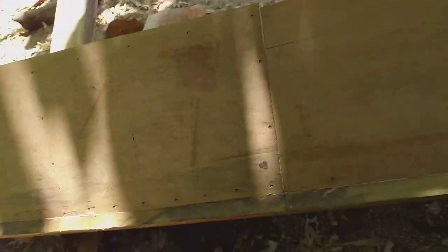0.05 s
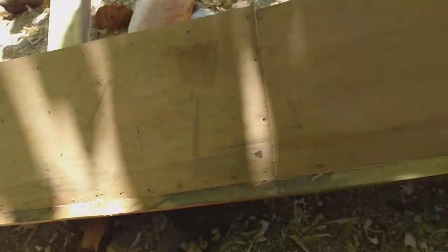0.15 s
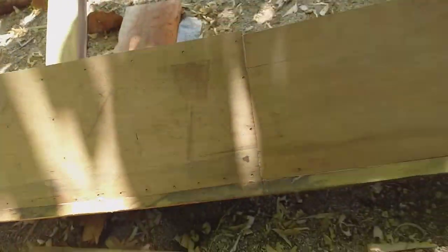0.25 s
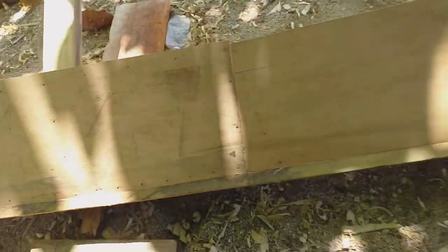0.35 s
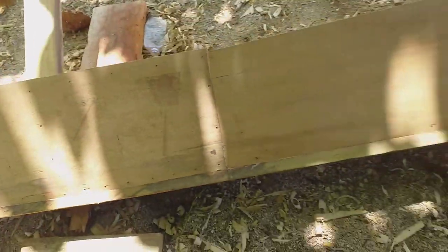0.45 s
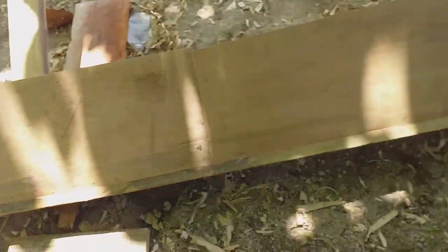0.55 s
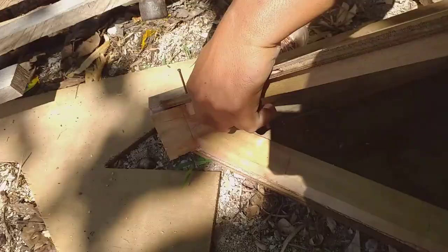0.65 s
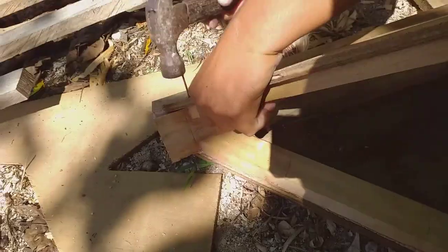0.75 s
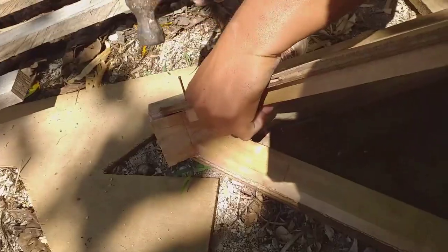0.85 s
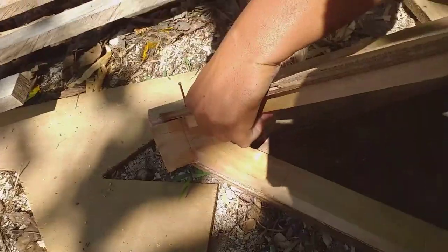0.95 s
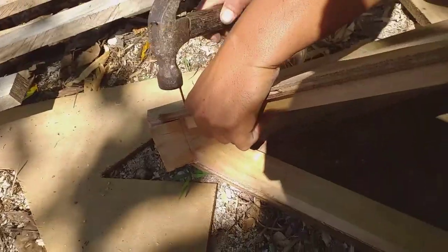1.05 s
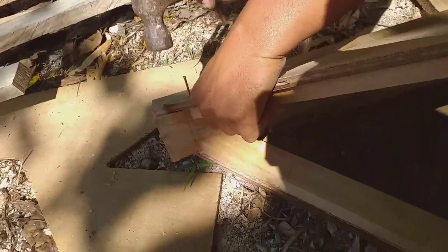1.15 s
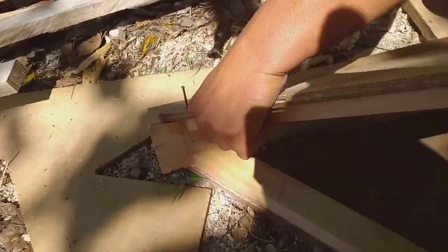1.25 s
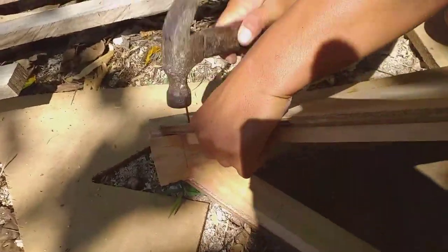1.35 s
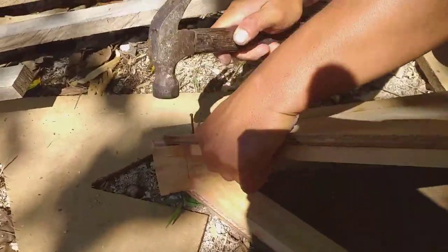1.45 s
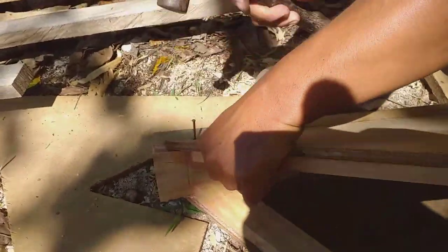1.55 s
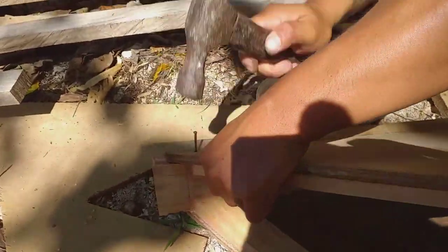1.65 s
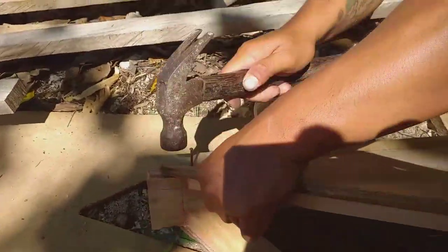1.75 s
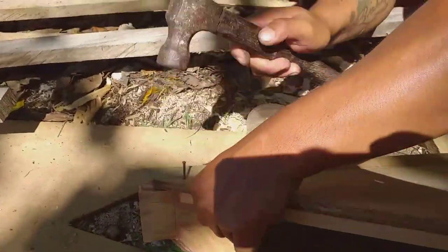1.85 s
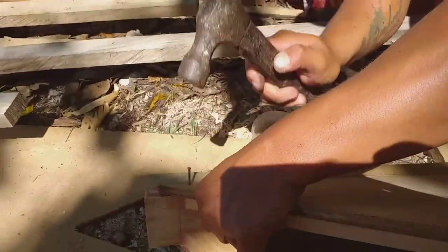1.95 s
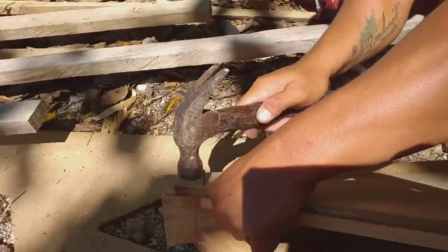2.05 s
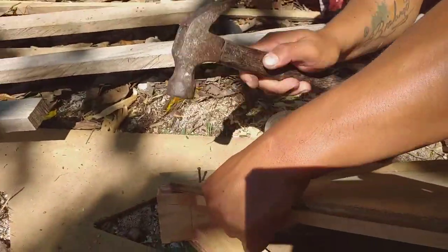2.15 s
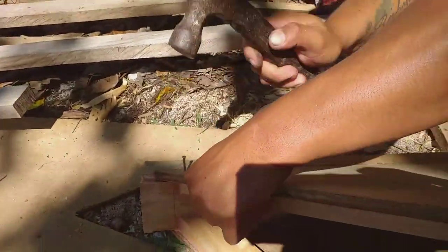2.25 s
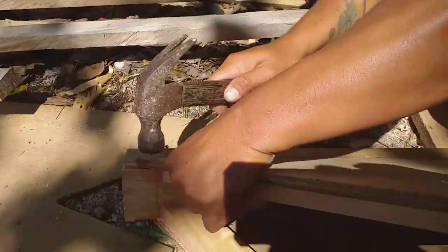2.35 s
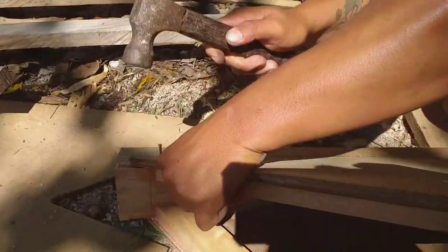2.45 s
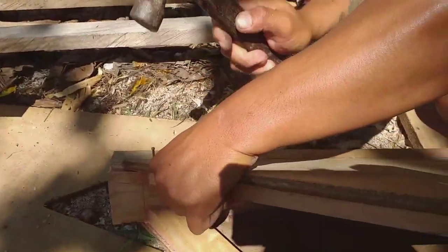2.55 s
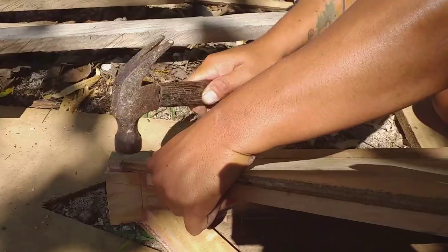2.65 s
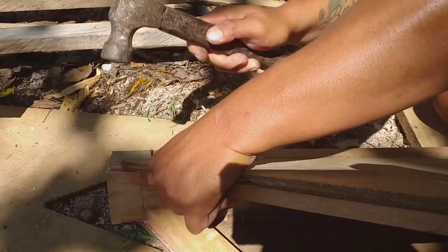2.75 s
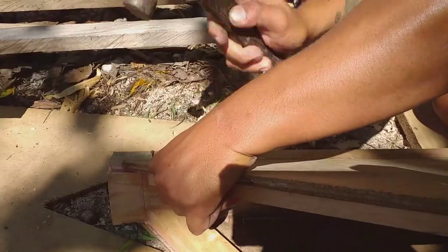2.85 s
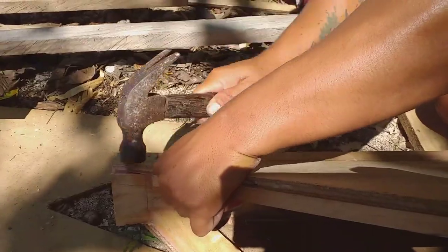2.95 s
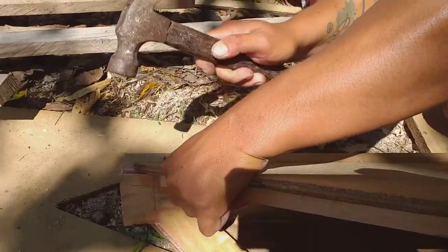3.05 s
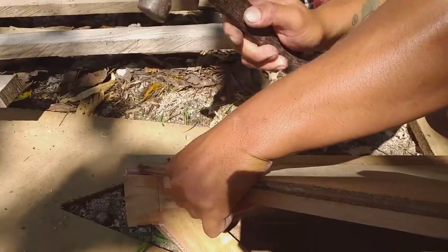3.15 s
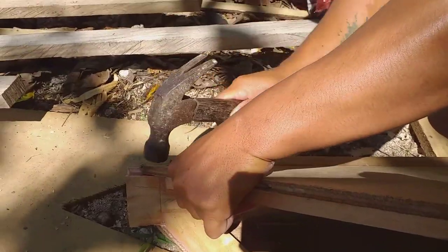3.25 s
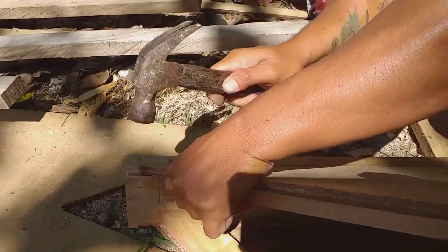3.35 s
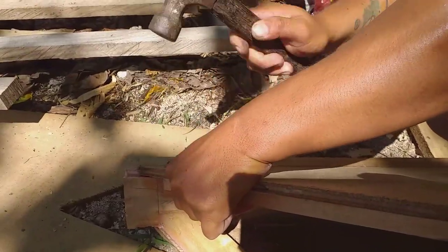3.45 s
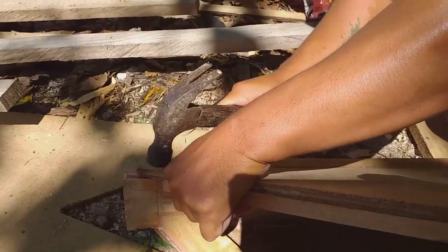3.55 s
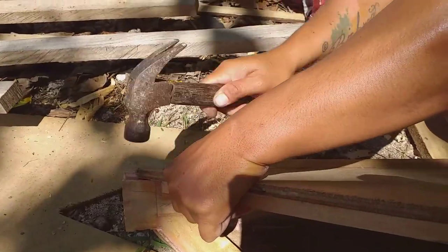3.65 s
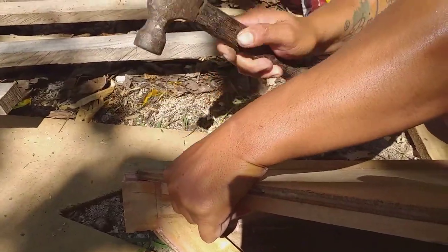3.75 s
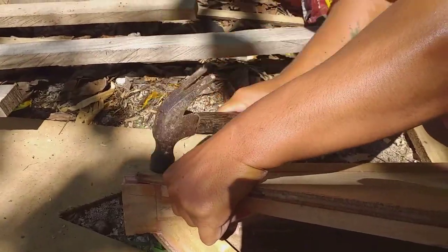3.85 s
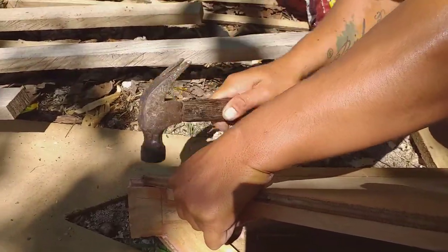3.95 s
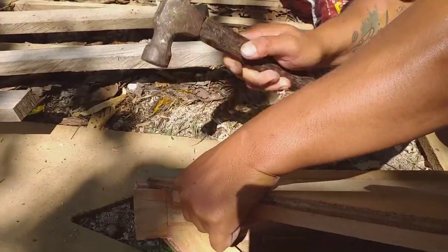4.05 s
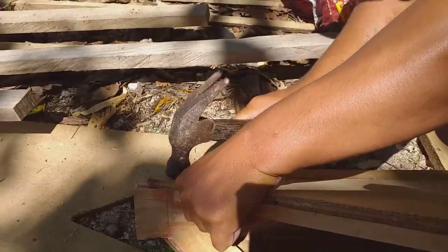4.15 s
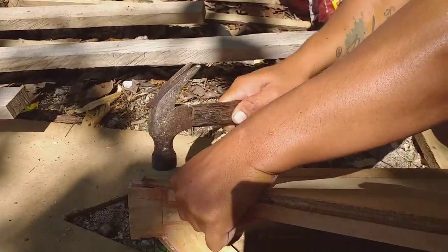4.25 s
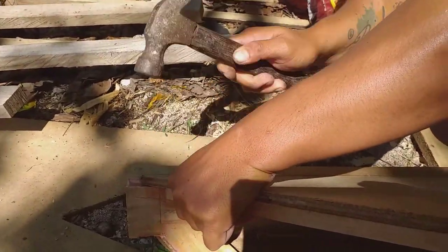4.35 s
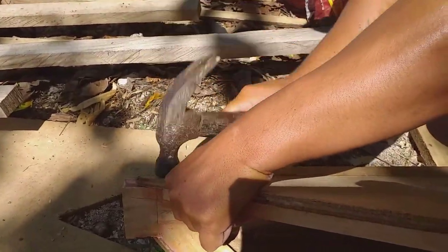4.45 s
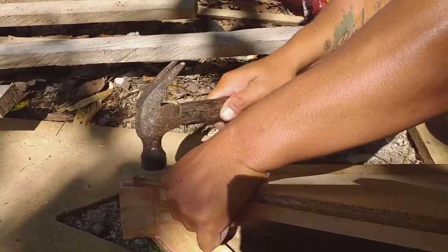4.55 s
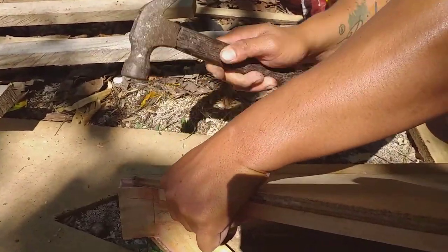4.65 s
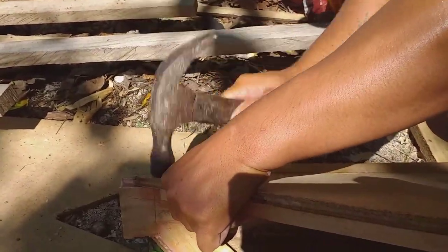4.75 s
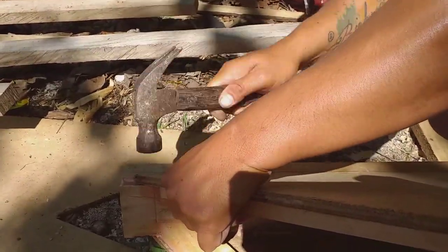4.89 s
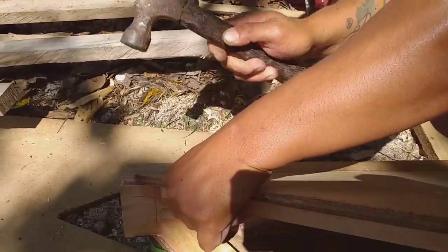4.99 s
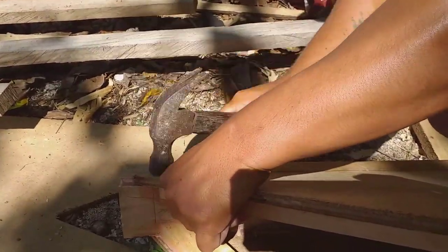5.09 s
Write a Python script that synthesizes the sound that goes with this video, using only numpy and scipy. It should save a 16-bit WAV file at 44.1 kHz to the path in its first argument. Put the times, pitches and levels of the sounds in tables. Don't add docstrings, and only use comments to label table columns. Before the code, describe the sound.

Handling bumps and dry rustle for under a second, then a claw hammer drives a nail into a wooden boat frame in steady, sharp blows.

```python
import sys
import numpy as np
from scipy import signal
from scipy.fft import rfft, irfft, next_fast_len
from scipy.io import wavfile
from scipy.ndimage import uniform_filter1d, map_coordinates

SR = 44100
rng = np.random.default_rng(int(sys.argv[2]) if len(sys.argv) > 2 else 0)


def gain_from_db(level_db):
    decades = np.asarray(level_db, float) / 20
    return 10 ** decades


def output_pcm(signal):
    pcm = np.clip(np.atleast_2d(signal).T, -1, 1) * 32767
    wavfile.write(sys.argv[1], SR, np.round(pcm).astype(np.int16))


N = 225770

# (time [s], crack [dB], push into wide panel [dB], narrow panel re wide [dB], rib re wide [dB])
BLOWS = [(0.7563, -2, -7.5, -7, -15), (1.068, 0, -17.5, 6.5, -3), (1.3868, 1.5, -15.5, 2, -3.5),
         (1.7087, 0, -15, -4.5, -6.5), (2.0298, .5, -13, -13, -1.5), (2.337, -1, -8, -7.5, -5),
         (2.6396, -1.5, -10, -11, -2), (2.9423, -1.5, -11.5, -7.5, 2.5), (3.268, -3, -10, 0, -4),
         (3.5837, 0, -8, -3, -4), (3.8901, -2, -7, -1, -4), (4.192, -1, -4, -1, -9),
         (4.4955, -0.5, -5.5, 0.4, -0.5), (4.8004, 0.5, -3, -1, -5), (5.1124, -3.5, -12.5, 5.5, 3.5)]
# (time [s], low parts [dB], high parts [dB])
SLAPS = [
    (1.098, -29, -47.5),
    (2.359, -30.5, -41.5),
    (2.961, -22.5, -34),
    (3.284, -24.5, -28.5),
    (3.624, -15, -26),
    (3.912, -11.5, -8),
    (4.21, -6, -12),
    (4.514, -6.5, -10),
    (4.819, -4.5, -9),
]
# (pitch [Hz], level [dB], time to fall 60 dB [s])
FRAME_TONES = [(62, 2.5, 0.071), (88.5, -15, 0.033), (117, -7, 0.12), (135, 11.5, 0.057)]
# (pitch [Hz], level [dB], time to fall 60 dB [s])
HEAD_TONES = [(4942, -3, .11), (5938, 0, .14)]
# (pitch [Hz], level [dB], time to fall 60 dB [s])
PLANK_TONES = [
    [(169.6, -19.5, .2), (207, -14, 0.1), (238.4, -1.5, 0.12), (272.9, -12, 0.19)],
    [(320, -6, .07), (355, 0, .09), (374, -10, .15), (392, -6, .175)],
    [(478, -6, 0.082), (531.6, 2.5, 0.065), (577.8, -4, 0.058), (678, -9.5, 0.052)],
    [(808.3, -2, 0.038), (846.3, -2, 0.062), (906, -4, 0.061)],
    [(1052.7, 5.5, 0.034), (1158, -9, .06), (1403, -8, 0.035), (1628, -6.5, .05), (1960, -14.5, 0.035)],
]
# (frequency [Hz], level per Hz [dB])
CRACK = [(530, -36.5), (900, -1), (1420, -3.5), (2060, -5), (2650, -9.5), (3670, -1.5), (5560, 0),
         (6810, -2), (7860, -3), (9000, -20.5), (11700, -46.5), (19800, -120)]
# (frequency [Hz], level per Hz [dB])
SCATTER = [(290, -32.5), (500, 1), (639, -14), (877, -4.5), (1510, -5.5), (2050, -7), (2400, -12.5),
           (3650, -8), (5300, -7.5), (6030, -5), (9160, -19), (13500, -19.5), (15600, -20)]
# (frequency [Hz], time to fall 60 dB [s])
YARD_DECAY = [(500, 0.1), (2000, 0.22), (5000, 0.25), (12000, 0.24)]
# (frequency [Hz], level per Hz [dB])
BOOM = [(30, -39), (60, -10.5), (90, 1), (170, 0), (270, 2), (450, -6.5), (700, -14), (1000, -27),
        (1500, -71)]
# (frequency [Hz], time to fall 60 dB [s])
BOOM_DECAY = [(80, .3), (200, .22), (500, .17), (1000, .14)]
# (frequency [Hz], level per Hz [dB])
SLAP_ECHO = [(250, -40.5), (450, 0.5), (700, -5), (1100, -7), (1700, -9.5), (3000, -22), (6000, -58)]
# (frequency [Hz], time to fall 60 dB [s])
SLAP_ECHO_DECAY = [(500, 0.28), (2000, 0.27)]
# (time [s], peak [dB], pitch [Hz], length [s])
BUMPS = [(0.104, -34, 100, 0.021), (0.177, -28, 79, 0.024), (0.278, -28.5, 121, 0.02),
         (0.292, -30.5, 140, 0.033), (0.382, -17, 175, 0.013), (0.422, -5.5, 171, 0.016),
         (0.443, -13.5, 108, 0.0088), (0.489, -17, 159.6, 0.023), (0.509, -16.5, 138, 0.023),
         (0.575, -4, 157, 0.013), (0.597, -18, 173, 0.011), (0.617, -25, 125, 0.026),
         (0.69, -18.5, 160, 0.014), (0.707, -37, 93, 0.028)]
# (time [s], peak [dB], treble re peak [dB], length [s])
TICKS = [
    (0.0004, -15, -9, 0.0037),
    (0.084, -39, -17, 0.0071),
    (0.235, -19, 5.5, 0.0067),
    (0.261, -27, 3.5, .013),
    (0.319, -21, 4.5, 0.038),
    (0.452, -34, -7, .02),
    (0.4654, 0.5, -19, 0.0046),
    (0.498, -28.5, 8, 0.0066),
    (0.557, -21.5, -7, 0.029),
    (0.637, -22.5, -9, 0.027),
]
# (frequency [Hz], level per Hz [dB])
DRY = [(530, -48), (900, -14.5), (3400, -7), (3670, -1.5), (4450, -7.5), (6490, -3), (9000, -16.5),
       (11700, -46.5), (19800, -120)]
# (start [s], length [s], pitch [Hz], level [dB])
COOS = [
    (0, .06, 430, -46),
    (.155, .14, 700, -41),
    (.243, .028, 14650, -37),
    (.27, .08, 1030, -52),
    (.26, .14, 1550, -50),
    (.29, .07, 2070, -51),
    (.4, .12, 1590, -51),
    (.42, .05, 660, -48),
]
# (start [s], length [s], pitch [Hz], level [dB], width [share of pitch])
SWISHES = [
    (0, .09, 1450, -41, .5),
    (.09, .13, 1600, -40, .45),
    (.12, .11, 12900, -36, .14),
    (2.49, .07, 6000, -57, .25),
    (2.52, .12, 6500, -65, .08),
    (.2, .2, 1570, -48, .12),
    (3.76, .13, 3900, -65, .08),
    (3.78, .1, 3050, -68, .07),
    (3.77, .13, 560, -67, .7),
    (4.38, .11, 7000, -63, .08),
]
# (frequency [Hz], level per Hz [dB])
RUMBLE = [(15, -29), (25, -11), (91, 3.5), (172, -8), (254, -13), (452, -22.5), (500, -22.5), (650, -53),
          (1100, -120)]
# (frequency [Hz], level per Hz [dB])
RUSTLE = [(150, -40.5), (250, -14), (615, -11), (703, -8.5), (855, -12.5), (1240, -11.5), (1580, -11),
          (1810, -13), (2300, -12.5), (8100, -11.5), (9000, -28.5), (11700, -46.5), (19800, -120)]
# (frequency [Hz], level per Hz [dB])
LEAVES = [(250, -45), (450, -13), (1000, -10), (2500, -7), (4000, -4), (6500, -3), (8000, -6), (9000, -20),
          (11000, -60)]
# (frequency [Hz], level per Hz [dB])
HISS = [(5000, -32.5), (8500, -10), (9240, -11), (10200, -7), (11300, -4.5), (13000, -4), (15100, -4.5),
        (15600, -21.5)]
# (time [s], effort [dB])
GRIP = [
    (0, -3.5),
    (.08, -11),
    (.17, 1),
    (.3, -3.5),
    (.4, -1),
    (.5, 2),
    (.64, 2.5),
    (.75, -1.5),
]
# (time [s], strength [dB])
BREEZE = [(.76, 4.5), (.86, 0.5), (1.3, -4.5), (1.7, -4), (1.9, 0.5), (2.3, -2), (2.5, -1), (3.22, -4.5),
          (3.5, -2), (3.8, -0.3), (4.2, 0.8), (4.7, 2.5), (5.12, 0.5)]

# (level with the nail proud [dB], gain once it is home [dB], gain by a full glance [dB])
TREBLE, THUD, YARD_ECHO = (-21.5, 2.4, 3.4), (-35, 1.5, 1.7), (-24.5, 1.8, -1.8)
HEAD_RING, BLOCK, UPPER_BLOCK = (-38, 5, 21), (-22, 8, -2.5), (-14, -4, 2.3)
GLANCE_DEPTH, GLANCE_SPREAD = .52, .18
BITE_DEPTH, BITE_DB = .25, 10
SLIDE_S = 0.0054
SETTING_TAP_DB = -3.5
SETTLED_DAMPING_DB_PER_S = 59.5
COO_RISE, COO_BLUR = .03, .015
INSECT_S, INSECT_RISE_S, INSECT_FADE_S, INSECT_HZ, INSECT_DB = 1.95, .13, .3, 12300, -60
SCENE_CHANGE_S = .752
CARRIED_DB, GRIP_SHARE = (-41.5, -40.5, -46), (2.1, .1, 0.45)
RESTING_DB, BREEZE_SHARE = (-65, -70, -78.5), (1.5, 1.1, .6)


def hammer():
    out, t = np.zeros(N), np.arange(SR // 2) / SR
    slide = (1 - np.exp(-(t / 0.00095) ** 2)) / (1 + (t / SLIDE_S) ** 4)
    depths = np.linspace(0, 1, len(BLOWS))
    for depth, (s, db, panel_db, narrow_db, rib_db) in zip(depths, BLOWS):
        glance = np.exp(-((depth - GLANCE_DEPTH) / GLANCE_SPREAD) ** 2)
        tap_db = SETTING_TAP_DB * (depth == 0)
        laws = BLOCK, UPPER_BLOCK, TREBLE, THUD, YARD_ECHO, HEAD_RING
        levels = [by_nail(law, depth, glance) + tap_db for law in laws]
        block_db, upper_db, treble_db, thud_db, echo_db, head_db = levels

        crack = gain_from_db(-6) * noise(CRACK, len(t)) + gain_from_db(treble_db + 2.0) * noise(HISS, len(t))
        bite_db = BITE_DB * (depth > BITE_DEPTH)
        thud = gain_from_db(thud_db + 8 + bite_db) * ring(FRAME_TONES, t, 0.01, spread_db=3, detune=0.051)
        blow = slide * crack + thud
        head = gain_from_db(head_db) * ring(HEAD_TONES, t, .002, spread_db=0, detune=0)
        push_db = [panel_db, panel_db + narrow_db, panel_db + rib_db, block_db, upper_db]
        wood = planks(t, push_db, attack=.0043) * gain_from_db(-SETTLED_DAMPING_DB_PER_S * depth * t)
        boom_swell = gain_from_db(-20.0 + 0.17 * panel_db) * (1 - np.exp(-t / 0.0028))
        boom = boom_swell * dying(BOOM, BOOM_DECAY, t, size=1024)
        echo = gain_from_db(echo_db) * yard_echo(t)
        add(out, s, gain_from_db(db) * blow + head + gain_from_db(5.5) * wood + boom + echo)
    return out + plank_slaps()


def plank_slaps():
    out, t = np.zeros(N), np.arange(SR // 2) / SR
    for s, low_db, high_db in SLAPS:
        slap = planks(t, [low_db, low_db, high_db, high_db - 3, high_db - 3], attack=.002)
        slap = slap * gain_from_db(-SETTLED_DAMPING_DB_PER_S * t)
        swell = gain_from_db(high_db - 23.5) * (1 - np.exp(-t / 0.0056))
        hollow = swell * dying(SLAP_ECHO, SLAP_ECHO_DECAY, t, size=512)
        clap = gain_from_db(high_db - 22 - 60 * t / .04) * noise(SCATTER, len(t))
        add(out, s, slap + hollow + clap)
    return out


def planks(t, levels_db, attack):
    return sum(gain_from_db(db) * ring(part, t, attack, spread_db=1.5, detune=.006)
               for db, part in zip(levels_db, PLANK_TONES))


def by_nail(law, depth, glance):
    return law[0] + law[1] * depth + law[2] * glance


def yard_echo(t):
    wall = 1 + .5 * np.exp(-((t - .024) / 0.0016) ** 2)
    near = dying(SCATTER, YARD_DECAY, t, size=256)
    far = gain_from_db(-19.5) * dying(LEAVES, [(500, 0.72), (6000, 0.57)], t, size=256)
    return patchy(near + far, depth_db=1) * wall * (1 - np.exp(-t / 0.0022))


def handling():
    out, t = np.zeros(N), np.arange(SR // 8) / SR
    for s, db, hz, length in BUMPS:
        u = t / length
        packet = (2.48 * u * np.exp(1 - 2.66 * u)) ** 2
        overtone = 0.58 * np.sin(4.1 * np.pi * hz * t) * np.exp(-3 * u)
        add(out, s, gain_from_db(db) * packet * (np.sin(2 * np.pi * hz * t) + overtone))
    for s, db, treble_db, length in TICKS:
        burst = noise(DRY, len(t)) + gain_from_db(treble_db) * noise(HISS, len(t))
        shape = (1 - np.exp(-t / 0.0018)) * np.exp(-(t / length) ** 2)
        add(out, s, gain_from_db(db - 16) * burst * shape)
    return out


def far_notes():
    out, t = np.zeros(N), np.arange(SR // 5) / SR
    coos = [coo + (COO_BLUR,) for coo in COOS]
    for s, length, hz, db, share in coos + SWISHES:
        u = np.clip(t / length, 0, 1)
        width_hz = share * hz
        blur = map_coordinates(rng.standard_normal(SR // 50), [t * width_hz + 2])
        steady = 30 / width_hz
        rise = COO_RISE * min(1, 700 / hz) ** 2 * u / 2
        tone = np.sin(2 * np.pi * hz * t * (1 + rise))
        swell = np.sin(np.pi * u ** .7)
        add(out, s, gain_from_db(db) * swell * tone * (blur + steady) / np.hypot(1, steady))
    return out


def insect():
    t = np.arange(N) / SR - INSECT_S
    swell = np.exp(-(t / np.where(t < 0, INSECT_RISE_S, INSECT_FADE_S)) ** 2)
    buzz = .8 * wobble(900) * np.sin(2 * np.pi * INSECT_HZ * t)
    rasp = noise(HISS, N) + buzz + .5 * noise(LEAVES, N)
    return gain_from_db(INSECT_DB) * swell * rasp


def yard_air():
    t = np.arange(N) / SR
    carried = t < SCENE_CHANGE_S
    grip = np.interp(t, *np.transpose(GRIP))
    breeze = np.interp(t, *np.transpose(BREEZE))
    levels = []
    for held_db, held, still_db, still in zip(CARRIED_DB, GRIP_SHARE, RESTING_DB, BREEZE_SHARE):
        levels.append(np.where(carried, held_db + held * grip, still_db + still * breeze))
    rumble_db, rustle_db, hiss_db = levels
    lumps = gain_from_db(3 * wobble(16))
    crackle = gain_from_db(carried * (1.4 * wobble(110) + 1.5 * wobble(400)))
    rustle = np.where(carried, patchy(noise(RUSTLE, N), depth_db=2.4), noise(LEAVES, N))
    hiss = patchy(noise(HISS, N), depth_db=1.2)
    rumble = gain_from_db(rumble_db) * lumps * noise(RUMBLE, N)
    return rumble + crackle * (gain_from_db(rustle_db) * rustle + gain_from_db(hiss_db) * hiss)


def ring(tones, t, attack, spread_db, detune):
    hz, db, t60 = np.transpose(tones)[:, :, None]
    strength, shift, phase = rng.standard_normal((3, len(tones), 1))
    fade = gain_from_db(db + spread_db * strength - 60 * t / t60)
    waves = fade * np.sin(2 * np.pi * hz * (1 + detune * shift) * t + phase)
    return waves.sum(axis=0) * (1 - np.exp(-(t / attack) ** 2))


def dying(spectrum, decay, t, size):
    hz, frames, z = signal.stft(noise(spectrum, len(t)), SR, nperseg=size)
    fade = gain_from_db(-60 * frames / along(decay, hz)[:, None])
    return signal.istft(z * fade, SR, nperseg=size)[1][:len(t)]


def patchy(x, depth_db):
    z = signal.stft(x, nperseg=256)[2]
    field = uniform_filter1d(rng.standard_normal(z.shape), 14, 0)
    field = uniform_filter1d(field, 7, 1)
    y = signal.istft(z * gain_from_db(depth_db * unit(field)), nperseg=256)[1][:len(x)]
    return unit(y) * np.std(x)


def noise(spectrum, size):
    m = next_fast_len(size + 2048)
    colour = gain_from_db(along(spectrum, np.fft.rfftfreq(m, 1 / SR)))
    return unit(irfft(rfft(rng.standard_normal(m)) * colour, m)[:size])


def wobble(rate):
    return map_coordinates(rng.standard_normal(int(N * rate / SR) + 4), [np.arange(N) * rate / SR])


def along(points, hz):
    f, v = np.transpose(points)
    return np.interp(np.log(hz + 1), np.log(f + 1), v)


def unit(x):
    return x / np.sqrt(np.mean(x ** 2) + 1e-20)


def add(track, s, x):
    part = track[max(round(s * SR), 0):][:len(x)]
    part += x[:len(part)]


def scene():
    return (hammer() + handling() + far_notes() + insect() + yard_air())[None]


def low_pass(x):
    return signal.sosfilt(signal.butter(12, 16540, fs=SR, output="sos"), x)


def record(dry):
    top, hardness = .99, 4.5
    low_cut = signal.butter(3, 46, "high", fs=SR, output="sos")
    high_cut = signal.cheby2(14, 35, 15850, fs=SR, output="sos")
    x = signal.sosfilt(np.vstack((low_cut, high_cut)), dry)
    x = x / (1 + np.abs(x / top) ** hardness) ** (1 / hardness)
    x = signal.sosfiltfilt(signal.butter(12, 16540, fs=SR, output="sos"), x)
    return low_pass(x)


dry = scene()
out = record(dry)
output_pcm(out)
```